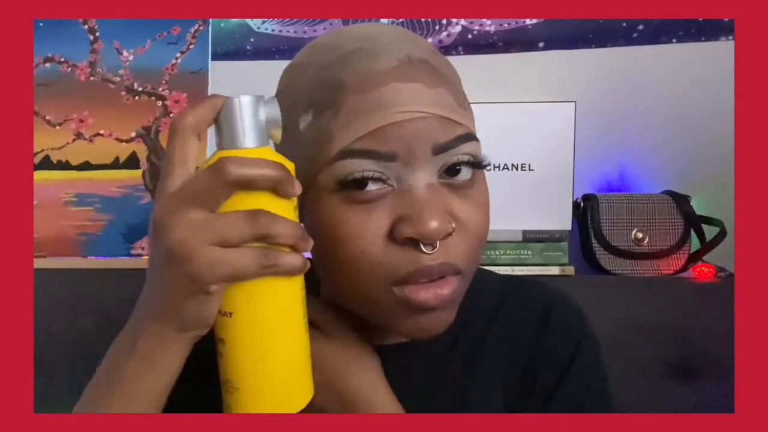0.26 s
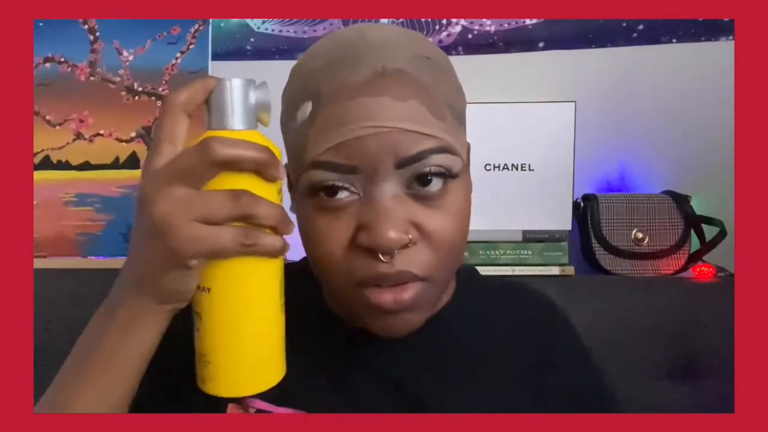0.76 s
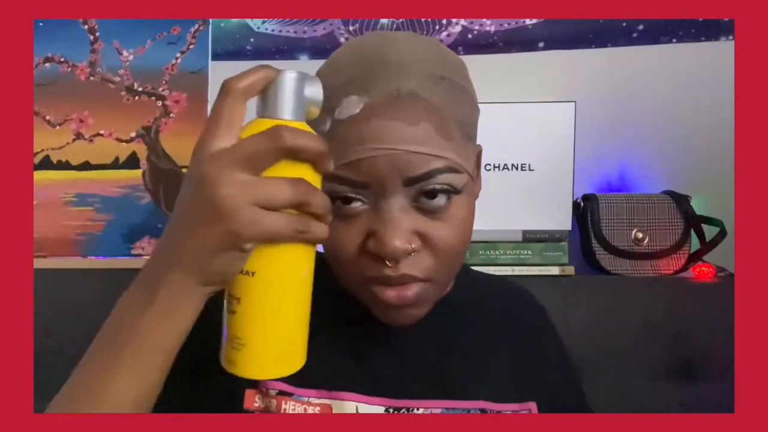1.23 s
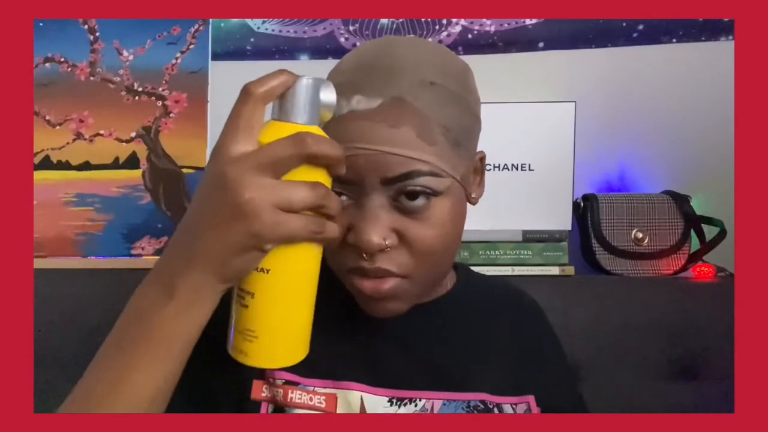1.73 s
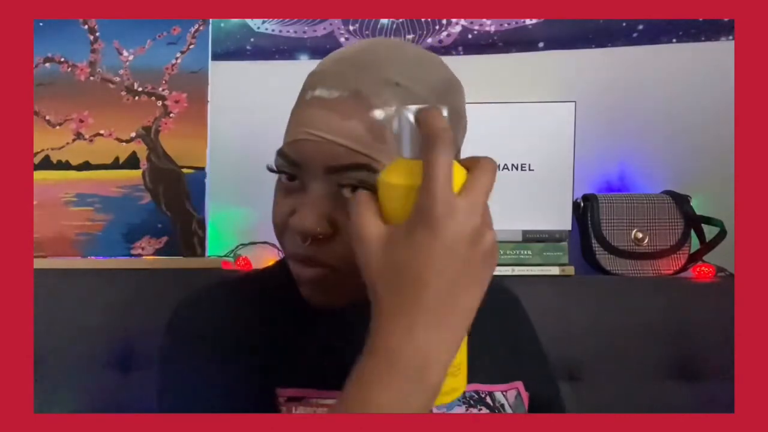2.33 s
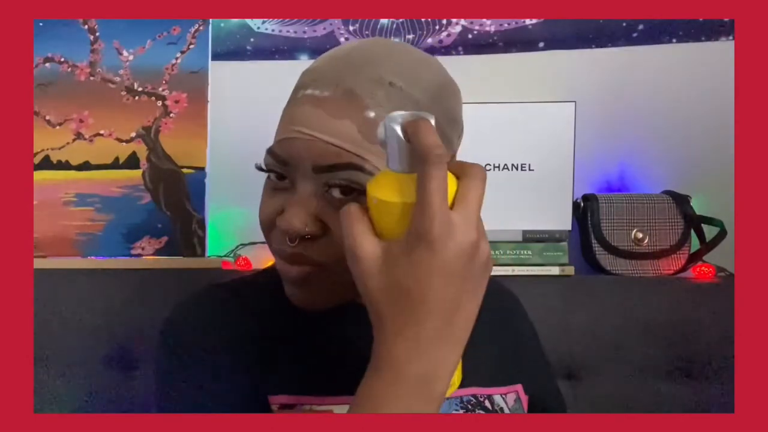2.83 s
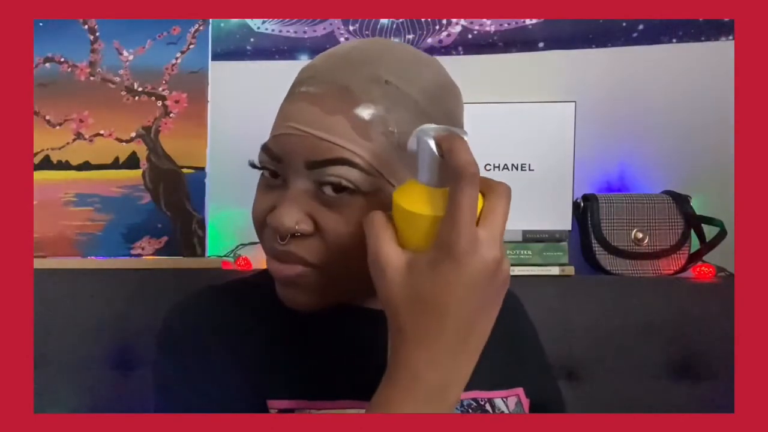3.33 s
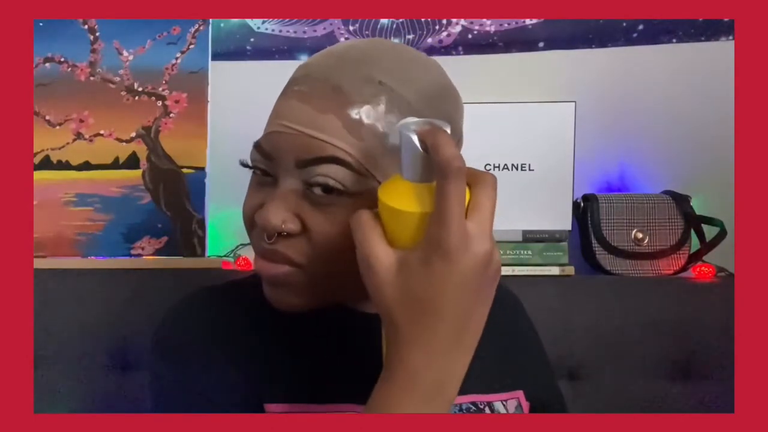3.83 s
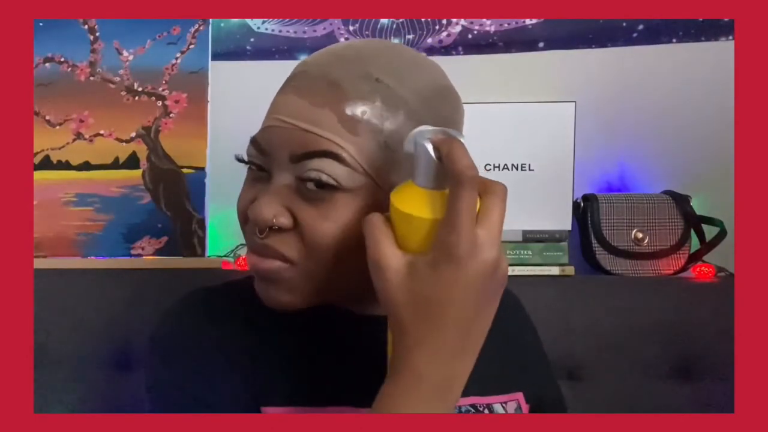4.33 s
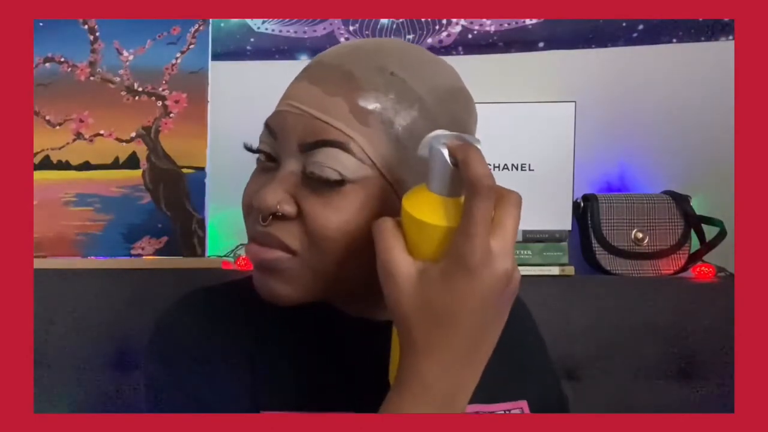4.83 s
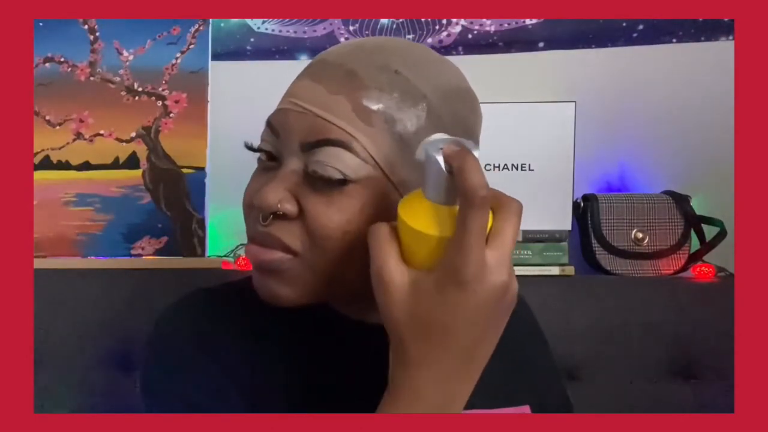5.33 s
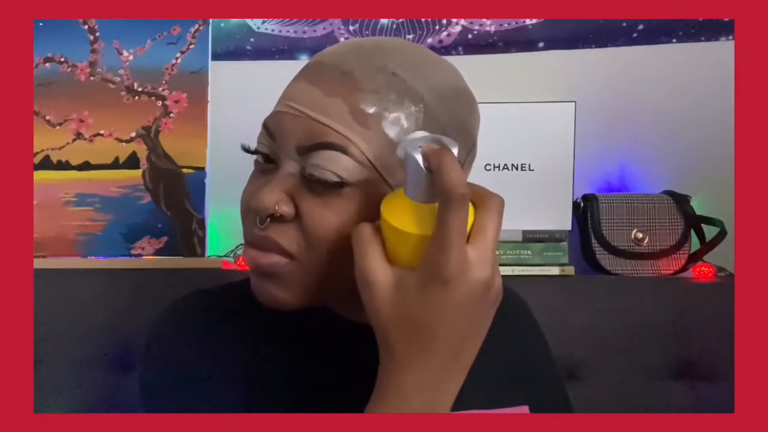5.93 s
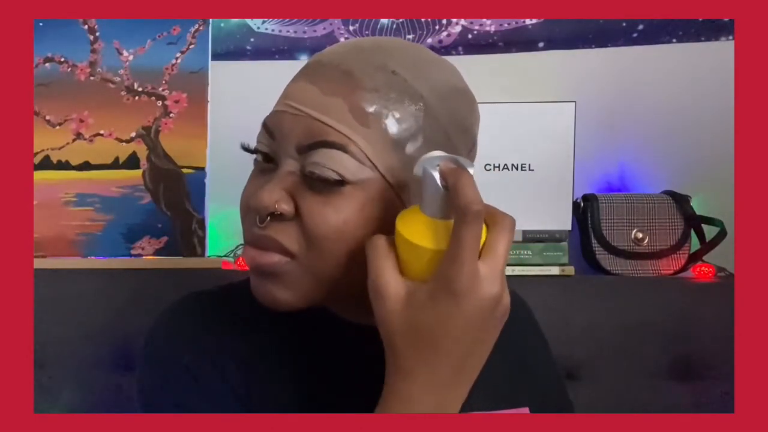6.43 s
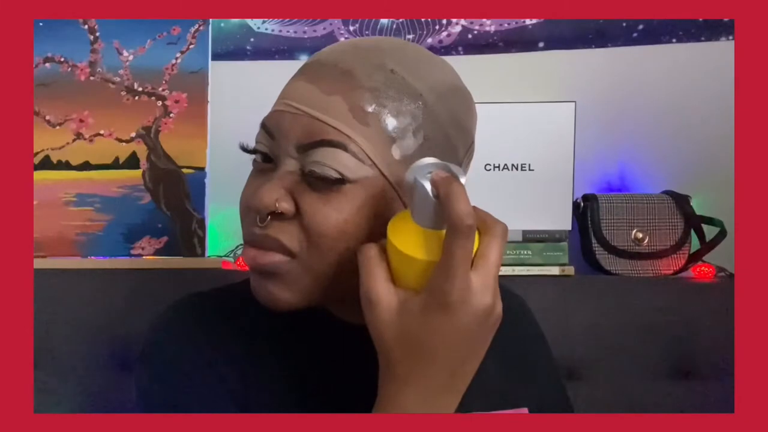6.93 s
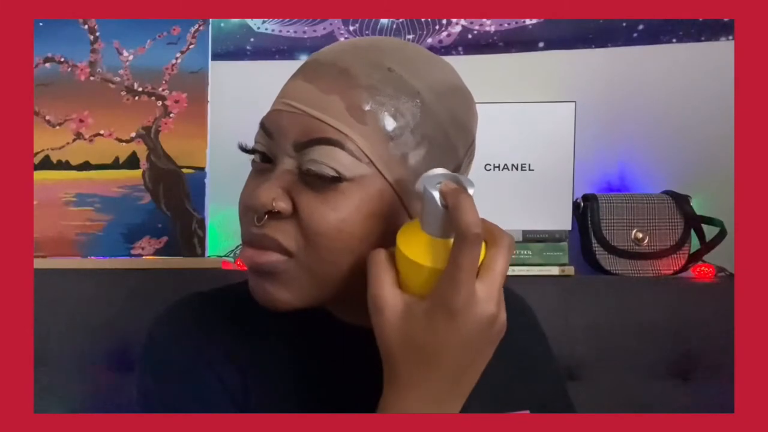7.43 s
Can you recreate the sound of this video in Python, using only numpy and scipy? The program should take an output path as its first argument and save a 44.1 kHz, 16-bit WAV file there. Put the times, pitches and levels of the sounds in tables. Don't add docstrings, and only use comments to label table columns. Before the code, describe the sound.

Rapid brief bursts of spray hiss close to the microphone, swelling and cutting off, with occasional valve clicks over faint ventilation rumble.

```python
import sys
import numpy as np
from scipy import signal
from scipy.fft import rfft, irfft, next_fast_len
from scipy.io import wavfile
from scipy.ndimage import map_coordinates

SR = 44100
rng = np.random.default_rng(int(sys.argv[2]) if len(sys.argv) > 2 else 0)


def level_to_linear(level):
    exponent = np.asarray(level, float) / 20
    return 10 ** exponent


def generate_wav(sig):
    pcm = np.round(np.clip(np.atleast_2d(sig).T, -1, 1) * 32767).astype(np.int16)
    wavfile.write(sys.argv[1], SR, pcm)


N = 338688

# opening in seconds, peak hiss in dB, rise in seconds, let go after seconds.
PRESSES = [(-.05, -37, .05, .116), (0.241, -53, 0.02, 0.079), (0.427, -37.5, 0.032, 0.11),
           (0.696, -58, 0.0013, 0.01), (0.86, -36.5, 0.04, .14), (1.128, -43, 0.043, 0.09),
           (1.368, -41.5, 0.047, 0.11), (1.624, -40.5, 0.055, 0.1), (1.866, -42, 0.093, 0.097),
           (2.248, -40.5, .056, 0.1), (2.566, -43, 0.074, 0.077), (2.899, -38.5, 0.043, 0.11),
           (3.199, -49, 0.083, 0.092), (3.423, -42.5, 0.046, 0.13), (3.712, -40, 0.056, 0.14),
           (4.043, -43, 0.06, 0.1), (4.302, -38, 0.055, 0.12), (4.584, -48.5, 0.088, 0.13),
           (4.99, -41, 0.031, .13), (5.298, -38.5, 0.067, .14), (5.57, -37, 0.044, 0.12),
           (5.85, -36.5, 0.055, 0.11), (6.123, -33.5, 0.06, .13), (6.402, -37.5, 0.045, .14),
           (6.707, -36, 0.047, 0.16), (7.121, -41.5, 0.081, 0.13), (7.428, -38, 0.05, .12)]
# first spit in dB re peak, sag while held, extra roar, extra mist in dB.
TOUCH = [(-14, -1, -3.5, -1.5), (-5.5, 1.5, -8, 2.5), (-12.5, -1, -1, 0), (-8, -2, -23, 3.5),
         (-16.5, -5.5, 0, 3), (-6.5, -1.5, 1, 3.5), (-13, -2, 2, 3.5), (-15, -2.5, 0.5, 1.5),
         (-14, -2, 1, 2), (-19, -4, -1.5, -2), (-10.5, -1, -2, -0.5), (-15, -3.5, 0, -1.5),
         (-7.5, 0, -1, 2.5), (-20, 0, 1.5, 0.5), (-22.5, -1, 2, 3), (-12, -.5, -0.5, 1),
         (-20.5, -5, 0.5, 0), (-6.5, 1.5, -1.5, 4), (-7.5, -2.5, 2.5, 2), (-15, -5, 2, 2.5),
         (-12.5, -1, -2, -3.5), (-15.5, -1.5, -2.5, -4), (-20, -6, -1.5, -3.5), (-19.5, -2, 0, 1.5),
         (-17.5, -2, -8, -1), (-5, 3, 0, 0.5), (-15.5, -.5, 0, -0.5)]
# shares in dB re hiss,
ROAR_SHARE_DB = (-30.5, -6.5, -2, -11, -28)
MIST_SHARE_DB = (-4.5, -10, -8, -4.5, -10.5)
PRESENCE_SHARE_DB = (0, 0.6, 0.3, 3.4, -0.2)
LOW_LAG_SHIFT = (0, 0.54, 0, .05, 1.8)
HIGH_LAG_SHIFT = (0.4, 0.15, -0.032, -0.14, -0.37)
# start in seconds, peak in dB.
PUFFS = [
    (0.377, -65),
    (1.1067, -54),
    (2.157, -65),
    (2.77, -48),
    (4.8277, -48),
    (5.8328, -47),
]
# time in seconds, splash peak in Hz, nozzle tone in Hz,
# facing the ports from 0 to 1, splash on the scalp in dB re hiss.
AIM = [(.1, 6000, 8250, 0.22, -14), (.33, 5670, 9100, 0.3, -15), (.55, 6380, 7120, .05, -6.5),
       (.8, 6230, 8700, 1, -1.5), (1.2, 5915, 7320, 0.9, 2), (1.72, 5420, 7700, 1, -0.5),
       (2.35, 4883, 8300, 0.17, -1), (2.66, 5080, 8560, 0.18, -3), (3.52, 5320, 7330, 0.1, 0),
       (4.14, 5460, 7260, 0, 0), (4.4, 5580, 7200, .95, -0.5), (5.1, 5744, 8400, 0.28, 0.5),
       (5.4, 5800, 7730, 1, 0.5), (5.67, 5870, 7570, 1, -5), (6.52, 6000, 7340, 0.74, -1),
       (6.83, 5800, 7320, .5, -5), (7.22, 5280, 7220, 0.85, -6), (7.68, 5390, 7140, 0.7, -3)]
# frequency in Hz, density in dB per Hz.
ROAR_COLOUR = [(130, -19.5), (220, -10.5), (350, -3.5), (800, 1), (1400, -1), (1800, -8.5), (2300, -12),
               (2800, -49)]
PRESENCE_COLOUR = [(900, -3.5), (1500, -7), (2200, -7), (3000, -7.5), (3700, -5.5), (4200, -8), (4700, -16)]
HISS_COLOUR = [(3700, -36), (4400, -13), (5500, -4), (7300, -4), (8800, -1), (9800, 3.5), (10600, -18.5),
               (11500, -25.5)]
MIST_COLOUR = [(9500, -20), (10400, -4), (11200, 0), (13000, -1), (15500, 0), (17500, -4)]
# frequency in Hz, width in Hz, level in dB re hiss.
CAN_MODES = [(1619, 180, -12.5), (1717, 56, -18.5), (2782, 76, -22), (3380, 320, -19.5)]
# time in seconds, peak in dB.
TICKS = [
    (0.8568, -42),
    (1.3705, -53),
    (2.5705, -85),
    (2.8995, -66),
    (4.043, -58),
    (4.978, -61),
    (4.993, -60),
    (5.2975, -56),
    (6.7106, -59),
    (7.1182, -35.5),
]
# time in seconds, peak in dB.
BUMPS = [
    (2.482, -58),
    (2.489, -56),
    (2.503, -61),
    (2.511, -51),
    (2.531, -60),
    (3.278, -40.5),
]
# time in seconds, lag of the left port in samples for lows and for highs,
# left-right balance in dB of roar, presence, highs.
PLACE = [
    (0, 1.5, 1.1, -.6, -.2, -.3),
    (.9, .6, 1.4, -.4, -.1, -.3),
    (1.3, 1.1, 3.3, -.6, -.1, -1.5),
    (2.1, 2.6, 3.7, -.6, -.3, -1.1),
    (2.3, 7.4, 4.2, -1.6, -4.5, .1),
    (4.2, 7.6, 4.4, -1.8, -4.1, .1),
    (5.2, 7.8, 4.5, -3.1, -3.1, -.1),
    (6.2, 7.1, 4.7, -2.6, -1.5, -.3),
    (6.6, 6.7, 5.1, -2.4, -.1, -2.6),
    (7.68, 6.6, 5.1, -2.2, .1, -2.6),
]
# frequency in Hz, density in dB per Hz.
RUMBLE_COLOUR = [(24, -42), (40, -1), (101, -8.5), (172, -14), (245, -12), (368, -15.5), (490, -22),
                 (685, -23.5), (2670, -35.5), (3310, -39.5), (3820, -30.5), (12000, -60.5), (15600, -84),
                 (22000, -120)]
# time in seconds, level in dB.
RUMBLE_DB = [(0.0, -81), (0.6, -78), (3.74, -78), (4.7, -80), (5.0, -77.5), (6.2, -76.5), (6.6, -83.5),
             (7.3, -80.5), (7.68, -79)]
# frequency in Hz, width in Hz, level in dB re rumble.
HUMS = [
    (57.5, 9.1, -2),
    (115, 8.7, -6),
]
# time in seconds, pitch in Hz, level in dB.
DRONE = [
    (3.2, 208, -86),
    (3.36, 208, -71),
    (3.5, 203.5, -69),
    (3.72, 212, -75),
    (3.95, 212, -91),
]

VALVE_S = 0.008
QUICK_RISE = 0.32
CLOSING_S, CLOSING_DB = 0.036, -5.5
BLEED_DB_PER_S, BLEED_S = -310, 0.065
LEAK_DB = -89
BROAD_DB, PRESENCE_DB, TONE_DB, UPPER_DB = -0.87, -10, -25, -3
BROAD_TURN_DB, PRESENCE_TURN_DB, TONE_TURN_DB, UPPER_TURN_DB = 0, -2, 18, -26
DEEP_HZ, DEEP_DB, DEEP_PER_DB = 467, 3, 0.3
TREMOR_LAG = 0.3
ROOM_T60_S, ROOM_DB, WALL_HZ = 0.19, -10, 6000
PRESENCE_WET_DB = -3
AIR_ALIKE = 0.83
WIDEN_HZ, WIDEN_LAG, WIDEN_STEP, WIDEN_WANDER = 6900, 8.55, 0.36, 0.075


def presses(opening_s):
    t = np.arange(0, N + 16, 16) / SR
    rules = (ROAR_SHARE_DB, MIST_SHARE_DB, PRESENCE_SHARE_DB, LOW_LAG_SHIFT, HIGH_LAG_SHIFT)
    at_rest = np.array([LEAK_DB, *(rule[-1] for rule in rules)])
    levels = at_rest[:, None] + 0 * t
    for (s, peak_db, rise_s, held_s), (spit_db, sag_db, roar_db, mist_db) in zip(PRESSES, TOUCH):
        steady_s = max(held_s - rise_s, opening_s)
        stages = s + np.cumsum([0, rise_s, steady_s, CLOSING_S, BLEED_S])
        closed_db = peak_db + sag_db + CLOSING_DB
        times = [s - opening_s, s, s + rise_s / 4, *stages[1:4], stages[3] + 1]
        course_db = [LEAK_DB, peak_db + spit_db, peak_db + spit_db * (1 - QUICK_RISE), peak_db,
                     peak_db + sag_db, closed_db, closed_db + BLEED_DB_PER_S]
        hiss = np.interp(t, times, course_db)
        roar, mist, *others = [np.interp(t, stages, rule) for rule in rules]
        this_press = [hiss, roar + roar_db, mist + mist_db, *others]
        levels = np.where(hiss > levels[0], this_press, levels)
    return in_time(np.transpose([t, *levels]))


def puffs():
    flow = np.zeros(N)
    for s, db in PUFFS:
        late = np.arange(N) / SR - s
        flow += level_to_linear(db - 9.0) * (late > 0) * np.exp(-np.abs(late) / 0.0061)
    return flow


def can_ring():
    white = rng.standard_normal(N)
    return sum(level_to_linear(db) * rms_one(resonance(resonance(white, hz, w), hz, w)) for hz, w, db in CAN_MODES)


def jet_roar(roar_db):
    roar = coloured(ROAR_COLOUR)[0]
    deep = signal.sosfiltfilt(signal.butter(2, DEEP_HZ, fs=SR, output="sos"), roar)
    deep_gain = level_to_linear(DEEP_DB + DEEP_PER_DB * roar_db)
    return level_to_linear(roar_db - 2.56) * (roar - deep + deep_gain * deep)


def jet(flutter_db, sputter_db, patchy_db):
    hiss_db, roar_db, mist_db, share_db, *_ = presses(VALVE_S)
    splash_hz, tone_hz, facing, splash_db = in_time(AIM)
    broad_db = BROAD_DB + BROAD_TURN_DB * facing
    presence_db = PRESENCE_DB + PRESENCE_TURN_DB * facing
    tone_db = TONE_DB + TONE_TURN_DB * facing
    upper_db = UPPER_DB + UPPER_TURN_DB * facing
    flow = level_to_linear(hiss_db + flutter_db * drift(14) + sputter_db * drift(400)) + puffs()
    presence = level_to_linear(presence_db + share_db) * coloured(PRESENCE_COLOUR)[0] + can_ring()
    layers = [(splash_db, noise_peak(splash_hz, 3300)),
              (tone_db, noise_peak(tone_hz, 1900)),
              (upper_db, noise_peak(11600, 1900)),
              (broad_db, coloured(HISS_COLOUR)[0]),
              (mist_db + 5.0, coloured(MIST_COLOUR)[0])]
    highs = sum(level_to_linear(db + patchy_db * drift(13.7)) * layer for db, layer in layers)
    return flow * jet_roar(roar_db), flow * presence, flow * highs


def knocks(events, modes, boost_db):
    clicks = np.full(N, 1e-18)
    for s, db in events:
        clicks[round(s * SR)] = level_to_linear(db + boost_db)
    return sum(resonance(resonance(clicks, hz, w), hz, 2 * w) * SR / np.pi / w for hz, w in modes)


def room(x):
    size = next_fast_len(N + SR)
    hz = np.fft.rfftfreq(size, 1 / SR)
    t60 = ROOM_T60_S / np.sqrt(1 + (hz / WALL_HZ) ** 2)
    response = np.zeros((2, len(hz)), complex)
    for k, lag_s in enumerate(rng.uniform(0.008, 0.03, 16)):
        loop = level_to_linear(-60 * lag_s / t60) * np.exp(-2j * np.pi * hz * lag_s)
        response[k % 2] += loop / (1 - loop) * (-1) ** (k // 2)
    return irfft(response * rfft(x, size), size)[:, :N]


def rumble(alike):
    mid, side = coloured(RUMBLE_COLOUR, channels=2)
    hums = sum(level_to_linear(db) * rms_one(resonance(rng.standard_normal((2, N)), hz, w)) for hz, w, db in HUMS)
    common = np.sqrt(alike) * (mid + hums[0])
    opposed = np.sqrt(1 - alike) * (side + hums[1]) * [[1], [-1]]
    drone_hz, drone_db = in_time(DRONE)
    drone = level_to_linear(drone_db) * noise_peak(drone_hz, 7.4)
    return level_to_linear(in_time(RUMBLE_DB)[0] + 6.5) * (common + opposed) + drone


def rms_one(x):
    return x / np.sqrt(np.mean(x ** 2) + 1e-20)


def coloured(spectrum, channels=1):
    hz, level_db = np.transpose(spectrum)
    grid = np.log(np.fft.rfftfreq(N, 1 / SR) + 1)
    shape = level_to_linear(np.interp(grid, np.log(hz), level_db, left=-90, right=-90))
    return rms_one(irfft(rfft(rng.standard_normal((channels, N))) * shape, N))


def noise_peak(hz, width_hz):
    r = np.exp(-np.pi * width_hz / SR)
    slow = rng.standard_normal(N) + 1j * rng.standard_normal(N)
    slow = signal.lfilter([1], np.poly([r, r, r]), slow)
    phase = 2 * np.pi * np.cumsum(hz + np.zeros(N)) / SR
    return rms_one(np.real(slow * np.exp(1j * phase)))


def resonance(x, hz, width_hz):
    r = np.exp(-np.pi * width_hz / SR)
    poles = [1, -2 * r * np.cos(2 * np.pi * hz / SR), r * r]
    return signal.lfilter(np.array([1, 0, -1]) * (1 - r * r) / 2, poles, x)


def drift(rate_hz):
    r = np.exp(-2 * np.pi * rate_hz / SR * 20)
    slow = signal.lfilter([1], [1, -2 * r, r * r], rng.standard_normal(N // 20 + 2002))[2000:]
    return np.interp(np.arange(N) / 20, np.arange(len(slow)), rms_one(slow))


def delayed(x, lag):
    return map_coordinates(x, [np.arange(N) - lag], order=5, mode="nearest")


def in_time(rows):
    s, *columns = np.transpose(rows)
    return [np.interp(np.arange(N) / SR, s, c) for c in columns]


def scene():
    low_lag, high_lag, *pans_db = in_time(PLACE)
    roar_tilt, presence_tilt, highs_tilt = level_to_linear(np.array(pans_db) / 2)
    roar, presence, highs = jet(flutter_db=1.21, sputter_db=0.7, patchy_db=1.5)
    roar = roar + knocks(BUMPS, [(330, 200), (600, 180)], -7.5)
    presence = presence + knocks(TICKS, [(1700, 1200), (3200, 990)], 4.0)
    *_, low_shift, high_shift = presses(VALVE_S)
    low_lag = low_lag + low_shift + TREMOR_LAG * drift(5.8)
    high_lag = high_lag + high_shift + TREMOR_LAG * drift(6.1)
    left = delayed(roar * roar_tilt + presence * presence_tilt, low_lag)
    left = left + delayed(highs * highs_tilt, high_lag)
    right = roar / roar_tilt + presence / presence_tilt + highs / highs_tilt
    walls = level_to_linear(ROOM_DB) * room(roar + level_to_linear(PRESENCE_WET_DB) * presence + highs)
    return np.array([left, right]) + walls + rumble(AIR_ALIKE)


def roll_off(x):
    return signal.sosfilt(signal.butter(12, 15800, fs=SR, output="sos"), x)


def record(dry):
    hz = np.fft.rfftfreq(N, 1 / SR)
    top = 1 / (1 + np.exp((WIDEN_HZ - hz) / 250))
    low, high = np.sqrt(1 - top), np.sqrt(top)
    left, right = rfft(dry)
    wandering = rfft(delayed(dry[1], WIDEN_WANDER * drift(4)))
    turn = 2 * np.pi * hz * WIDEN_LAG / SR
    copy = -wandering * np.exp(-1j * (turn - WIDEN_STEP * np.sin(2 * turn)))
    ports = np.array([low * left + high * right, low * right + high * copy])
    return roll_off(irfft(ports, N))


dry = scene()
out = record(dry)
generate_wav(out)
```